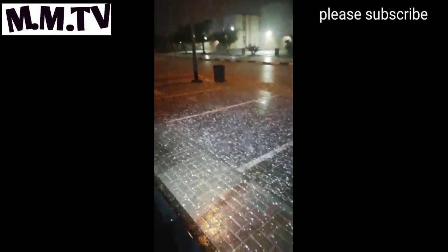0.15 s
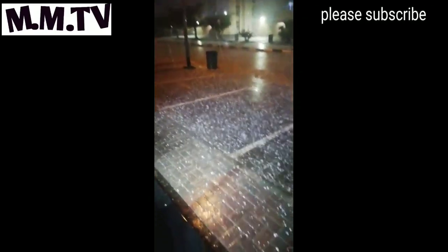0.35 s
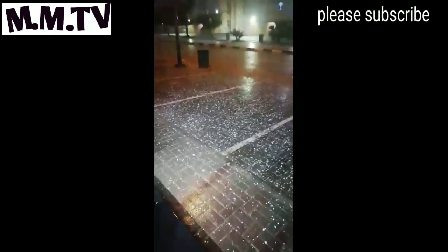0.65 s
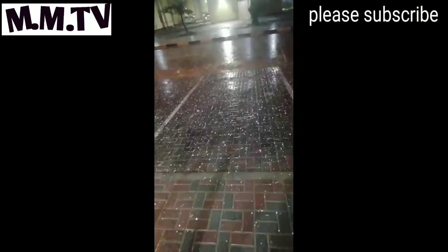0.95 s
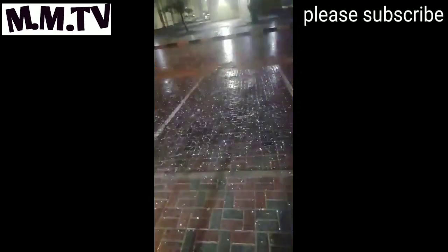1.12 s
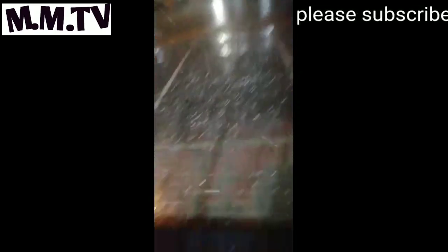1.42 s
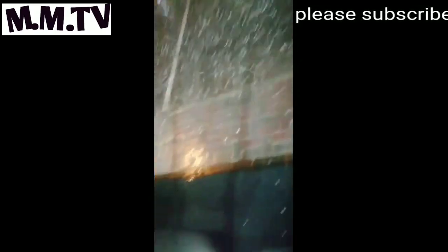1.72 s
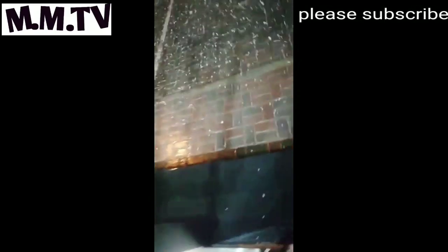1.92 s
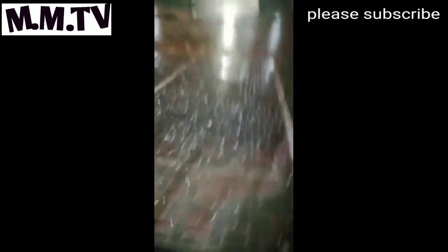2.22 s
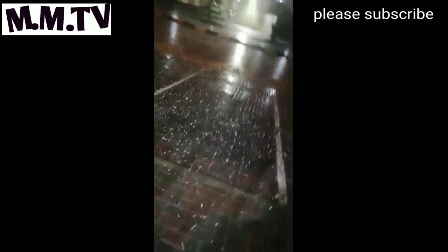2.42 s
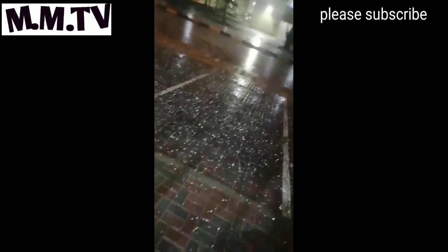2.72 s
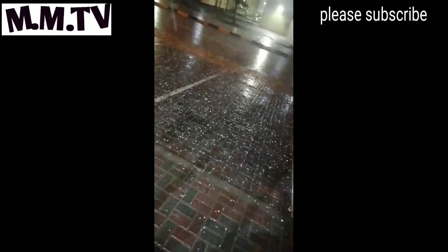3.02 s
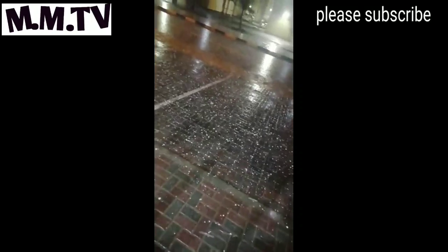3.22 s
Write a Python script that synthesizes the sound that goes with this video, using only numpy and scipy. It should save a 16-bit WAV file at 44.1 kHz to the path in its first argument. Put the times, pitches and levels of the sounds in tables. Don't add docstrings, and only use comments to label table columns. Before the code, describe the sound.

Hail and rain pelt brick paving outdoors in a dense bright hiss, with crisp ticks and close cracks; the sound drops out briefly, snaps back fuller, and a low wind puff flutters near the end. Handheld phone, stereo.

```python
import sys
import numpy as np
from scipy import signal
from scipy.fft import rfft, irfft
from scipy.io import wavfile
from scipy.ndimage import uniform_filter1d

SR = 44100
rng = np.random.default_rng(int(sys.argv[2]) if len(sys.argv) > 2 else 0)


def log_audio(samples):
    frames = np.atleast_2d(samples).T
    limited = np.clip(frames, -1, 1)
    pcm = np.round(limited * 32767).astype(np.int16)
    wavfile.write(sys.argv[1], SR, pcm)


def linear_from_db(decibels):
    return 10 ** (np.asarray(decibels, float) / 20)


N = 147735

# (time [s], level [dB], drumming [dB])
DOWNPOUR_STRENGTH = [
    (0, -22, -3.5),
    (0.218, -20.5, -3.5),
    (.28, -23, -5),
    (.375, -23, 0.5),
    (.385, -24.5, -3.5),
    (0.499, -22.5, -1),
    (.87, -21.5, -4),
                     (1.289, -23, 2.5),
    (1.5, -23.5, 0.5),
    (1.75, -23, 2.5),
    (2.0, -23.5, 0.8),
    (2.25, -23, 2),
    (2.5, -24.5, 2.3),
    (2.8, -24, 1.5),
    (3.1, -24, 2.5),
    (3.35, -22, -1),
]
# (frequency [Hz], gain [dB])
PAVING = [(40, -9.5), (120, -1.4), (300, -3), (600, -5), (1200, -1.5), (1900, 1.77), (3800, -6),
          (16000, -5.5)]
# (frequency [Hz], gain [dB])
LEFT_PORT = [(2300, -0.17), (4000, 1), (6500, -4), (7550, -14.5), (8100, -11), (9250, -8), (9800, -8.5),
             (14000, -6)]
# (frequency [Hz], gain [dB])
RIGHT_PORT = [(400, 1.1), (1500, 2.5), (3900, 2), (6400, 4.5), (7700, -7), (9300, -14), (10000, -10.5),
              (13800, -20.5)]
# (frequency [Hz], likeness
LIKENESS = [(278, 0.99, 0.55), (443, .4, 1.5), (690, 0.49, 3.1), (900, 0.79, 5), (1300, 0.26, 6.2),
            (2590, -0.62, 6.3), (3400, 0.65, 4.8), (4300, -1.33, 14)]
# (time [s], peak level [dB], left over right [dB])
STONES = [(0.2458, -9, 3), (0.3411, -15, 10.0), (0.3755, -10, 4), (0.4599, -12, 4), (0.5452, -18.5, 13),
          (0.5811, -13, 10.0), (0.7203, -12, 15), (0.7512, -9, 6), (0.7946, -12, -5), (1.277, -21, 11),
          (1.3648, -13, 1), (1.3872, -24, 8.5), (1.495, -12, 18), (1.5319, -20, 14), (1.5883, -4, 20),
          (1.6945, -20, 9.5), (1.941, -25, 12), (2.0928, -19, 9), (2.172, -16, 4), (2.2248, -17, 12.5),
          (2.2413, -10, 2), (2.5107, -11, 13.0), (2.5361, -17.5, 9), (3.1268, -18, 10.5), (3.2869, -18, 2)]
# (left [Hz], right [Hz])
PORT_TOP_HZ = [15480, 15130]

PATTER_DB, PATTER_PER_S, PATTER_SPREAD_DB, PATTER_LOW_HZ = 1.55, 3500, 3, 1500
HAIL_DB, HAIL_PER_S, HAIL_SPREAD_DB, HAIL_LOW_HZ = -1, 350, 4.5, 6000
STONE_DB, STONE_T60_S, STONE_LOW_HZ = 12.5, 0.0041, 5680
STONE_LATE_S, STONE_LAG_S = 0.0008, 0.00039
WASH_DB, WASH_PATCHY_DB = 4, 0.4
WIND_DB, WIND_LOW_HZ, WIND_HZ, WIND_LUMPY_DB, WIND_OWN_DB = -39, 42.7, 134, 3, -13
GUST_DB, GUST_S, GUST_RISE_S, GUST_FALL_S = -23.5, 2.772, 0.01, 0.17
GUST_HZ, GUST_SAG_HZ_PER_S = 135, 330
DRUM_HZ, DRUM_OCTAVES = 1200, 1.4
LIKENESS_ENDS_HZ = 5200
PORT_RING_HZ, PORT_RING_WIDTH_HZ, LEFT_RING_DB, RIGHT_RING_DB = 14950, 350, 4, 5
LIMIT_DB, RELEASE_DB_PER_S, DUCK_MOST_DB, CEILING = -1, 150, 2, 0.91
FAINT_DB, FAINT_DB_PER_OCTAVE = [-59, -61.5], [-4.5, -8.5]
FAINT_FROM_HZ, FAINT_SCATTER_DB = 8000, 3.5
DROPOUT_S, RESUME_S, CUT_S, LINGER_DB, LINGER_S = 0.8768, 1.2773, 0.0006, -20, 0.004


def rms_one(x):
    return x / np.sqrt(np.mean(x ** 2) + 1e-20)


def at_hz(points, hz, axis=1):
    points = np.array(points)
    return np.interp(np.log(hz + 1), np.log(points[:, 0]), points[:, axis])


def butter(order, hz, kind, x):
    return signal.sosfilt(signal.butter(order, hz, kind, fs=SR, output="sos"), x)


def drift(rate):
    pole = np.exp(-80 * np.pi * rate / SR)
    noise = rng.standard_normal(N // 40 + 2002)
    slow = signal.lfilter([1], [1, -2 * pole, pole * pole], noise)[2000:]
    return np.interp(np.arange(N) / 40, np.arange(len(slow)), rms_one(slow))


def impacts(per_s, spread_db):
    size_db = spread_db * np.minimum(rng.exponential(1, (2, N)), 4)
    sizes = linear_from_db(size_db) * rng.choice([-1, 1], (2, N))
    chance = per_s * linear_from_db(drift(20)) / SR
    return rms_one(sizes * (rng.random((2, N)) < chance))


def patter():
    return linear_from_db(PATTER_DB) * butter(1, PATTER_LOW_HZ, "high", impacts(PATTER_PER_S, PATTER_SPREAD_DB))


def hail():
    ticks = butter(2, HAIL_LOW_HZ, "high", impacts(HAIL_PER_S, HAIL_SPREAD_DB))
    return linear_from_db(HAIL_DB) * rms_one(ticks)


def stones():
    out = np.zeros((2, N + SR))
    t = np.arange(1500) / SR
    grits = rng.standard_normal((len(STONES), 2, len(t)))
    for (s, db, pan), grit in zip(STONES, grits):
        decay = linear_from_db(db + STONE_DB - 60 * t / STONE_T60_S)
        crack = np.sign(grit) * decay * linear_from_db([[0], [3 - pan]])
        for side, lag in enumerate([0, STONE_LAG_S]):
            i = int((s + STONE_LATE_S + lag) * SR)
            out[side, i:i + len(t)] += crack[side]
    return butter(2, STONE_LOW_HZ, "high", out[:, :N] + 1e-18)


def wash():
    out = 0
    edges = 30 * 2 ** np.arange(0, 9.6, 1)
    white = rng.standard_normal((2, N))
    for low, high in zip(edges, edges[1:]):
        out = out + butter(1, [low, high], "band", white) * linear_from_db(WASH_PATCHY_DB * drift(9))
    return linear_from_db(WASH_DB) * rms_one(out)


def wind():
    both, left, right = butter(1, [WIND_LOW_HZ, WIND_HZ], "band", rng.standard_normal((3, N)))
    low = rms_one(both + linear_from_db(WIND_OWN_DB) * np.array([left, right]))
    buffeting = linear_from_db(WIND_DB + WIND_LUMPY_DB * drift(7)) * low
    t = np.arange(N) / SR - GUST_S
    puff = np.clip(t / GUST_RISE_S, 0, 1) * np.exp(-(np.maximum(t, 0) / GUST_FALL_S) ** 2)
    phase = 2 * np.pi * np.cumsum(np.clip(GUST_HZ - GUST_SAG_HZ_PER_S * t, 72, 200)) / SR
    flutter = (1 + 0.4 * drift(20)) * np.sin(phase + 0.9 * drift(20))
    flutter = flutter + 0.55 * drift(25) * np.sin(1.6 * phase)
    return buffeting + linear_from_db(GUST_DB) * puff * flutter


def spread(pair):
    hz = np.arange(N // 2 + 1) * SR / N
    alike = np.clip(at_hz(LIKENESS, hz), -0.99, 0.99) * np.exp(-(hz / LIKENESS_ENDS_HZ) ** 4)
    lead = np.exp(1j * at_hz(LIKENESS, hz, axis=2))
    first, second = rfft(pair)
    right = alike * lead * first + np.sqrt(1 - alike ** 2) * second
    return np.array([pair[0], irfft(right, N)])


def colour(x, db_at):
    size = 4096
    cepstrum = irfft(np.log(linear_from_db(db_at(np.arange(size // 2 + 1) * SR / size))))
    cepstrum[1:size // 2] *= 2
    cepstrum[size // 2 + 1:] = 0
    response = irfft(np.exp(rfft(cepstrum)))
    return signal.fftconvolve(x, np.atleast_2d(response), axes=1)[:, :N]


def scene():
    s, level_db, drum_db = np.transpose(DOWNPOUR_STRENGTH)
    t = np.arange(N) / SR
    rain = spread(patter() + hail() + wash()) * linear_from_db(np.interp(t, s, level_db))
    drops = colour(rain + stones(), lambda hz: at_hz(PAVING, hz) + 8)
    hz = np.arange(N // 2 + 1) * SR / N
    hump = np.exp(-0.5 * (np.log2((hz + 1) / DRUM_HZ) / DRUM_OCTAVES) ** 2)
    drum = irfft(rfft(drops) * hump, N)
    return drops + (linear_from_db(np.interp(t, s, drum_db)) - 1) * drum + wind()


def ports(dry):
    ring = lambda hz: np.exp(-0.5 * ((hz - PORT_RING_HZ) / PORT_RING_WIDTH_HZ) ** 2)
    left = colour(dry[:1], lambda hz: at_hz(LEFT_PORT, hz) + LEFT_RING_DB * ring(hz))
    right = colour(dry[1:], lambda hz: at_hz(RIGHT_PORT, hz) + RIGHT_RING_DB * ring(hz))
    return np.vstack([left, right])


def limiter(x):
    release = RELEASE_DB_PER_S * np.arange(N) / SR
    over = np.clip(20 * np.log10(np.abs(x).max(axis=0) + 1e-9) - LIMIT_DB, 0, DUCK_MOST_DB)
    duck = np.maximum.accumulate(over + release) - release
    x = x * linear_from_db(-uniform_filter1d(duck, size=44))
    return x / (1 + (x / CEILING) ** 6) ** (1 / 6)


def thin(x):
    shape = dict(fs=SR, window="cosine", nperseg=2048, noverlap=1024)
    offset = 826
    hz, s, lines = signal.stft(np.pad(x, [(0, 0), (offset, 0)]), **shape)
    scatter = np.repeat(rng.standard_normal((2, 129, len(s))), 8, axis=1)[:, :len(hz)]
    octaves = np.log2(np.maximum(hz / FAINT_FROM_HZ, 1))
    faint_db = np.outer(FAINT_DB_PER_OCTAVE, octaves) + np.reshape(FAINT_DB, (2, 1))
    limit = linear_from_db(faint_db[:, :, None] + FAINT_SCATTER_DB * scatter)
    level = np.sqrt(uniform_filter1d(np.abs(lines) ** 2, size=6, axis=1))
    return signal.istft(lines * (level > limit), **shape)[1][:, offset:offset + N]


def dropout(x):
    t = np.arange(N) / SR
    since = np.maximum(t - DROPOUT_S, 0)
    tail = linear_from_db(LINGER_DB) * np.exp(-since / LINGER_S) * (since < 0.03)
    fading = np.maximum(np.exp(-since / CUT_S), tail)
    return x * np.where(t < RESUME_S, fading, np.minimum(0.2 + (t - RESUME_S) / CUT_S, 1))


def band_limit(x):
    return signal.sosfilt(signal.butter(12, 16020, fs=SR, output="sos"), x)


def record(dry):
    x = limiter(ports(dry))
    top_cut = [signal.sosfilt(signal.ellip(12, 0.3, 60, hz, fs=SR, output="sos"), side)
               for hz, side in zip(PORT_TOP_HZ, x)]
    mix = dropout(thin(np.array(top_cut)))
    return band_limit(mix)


dry = scene()
out = record(dry)
log_audio(out)
```